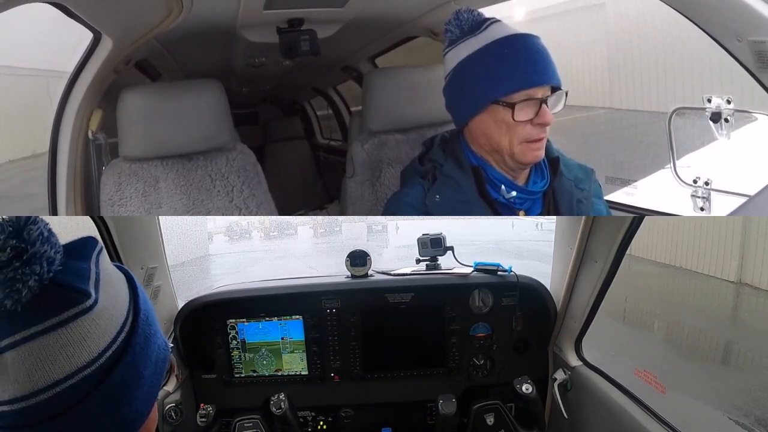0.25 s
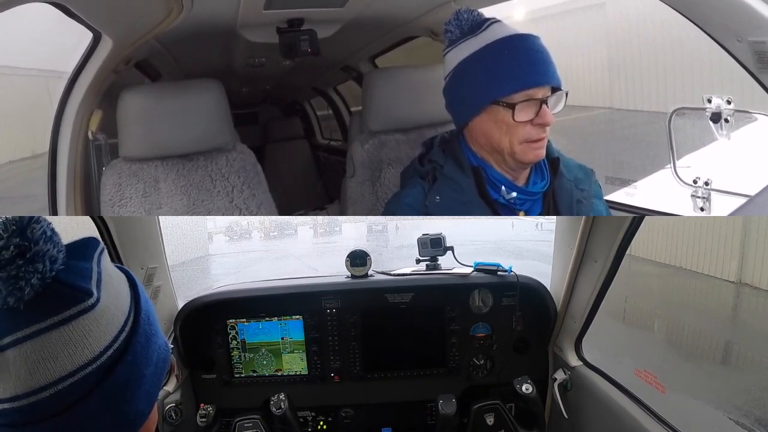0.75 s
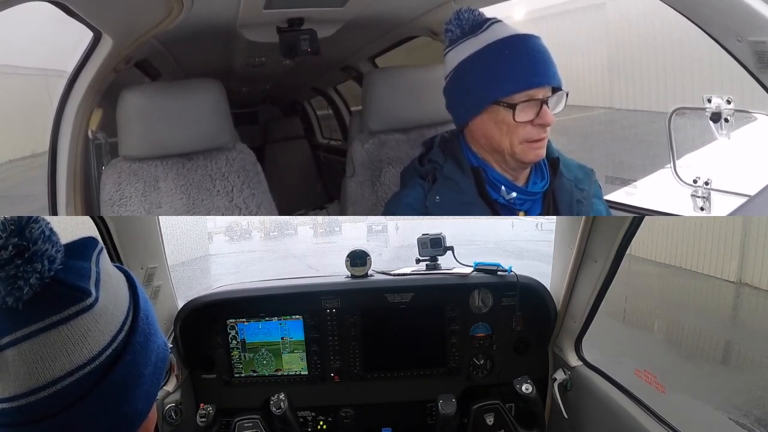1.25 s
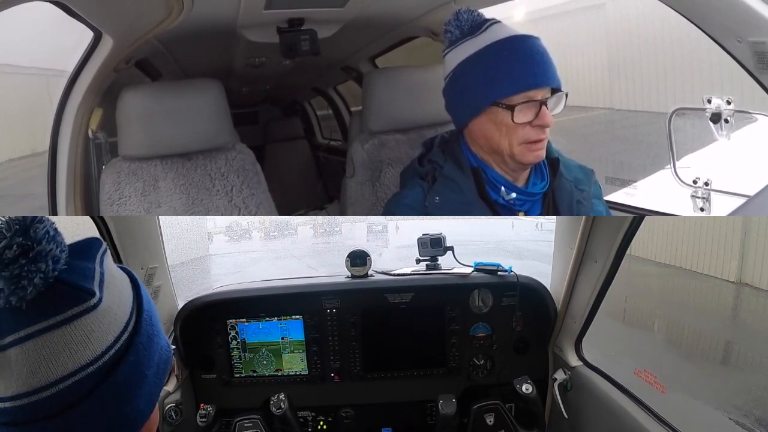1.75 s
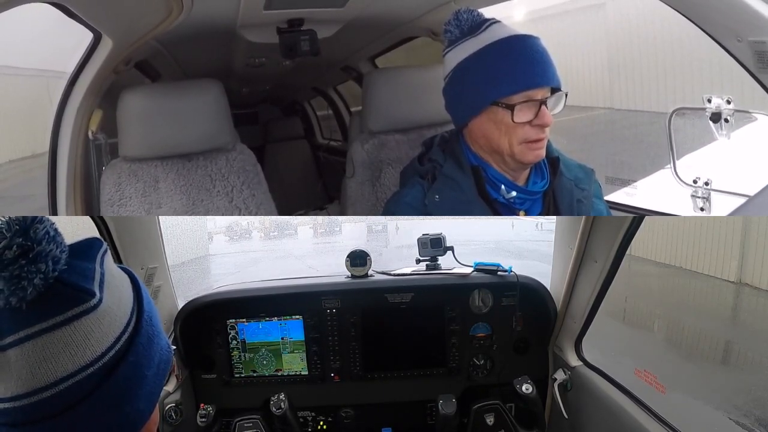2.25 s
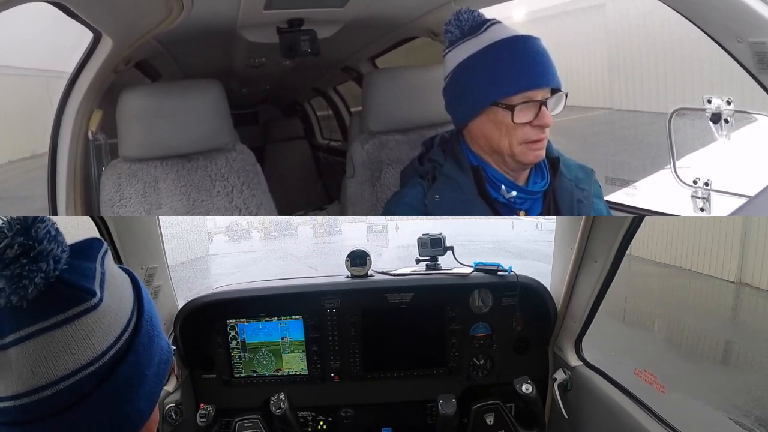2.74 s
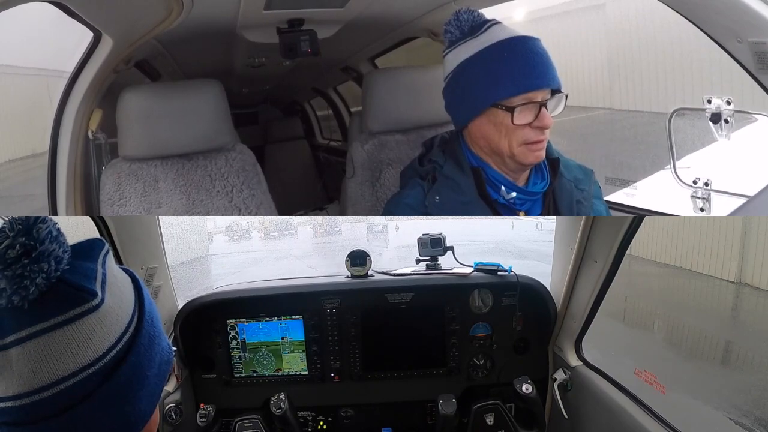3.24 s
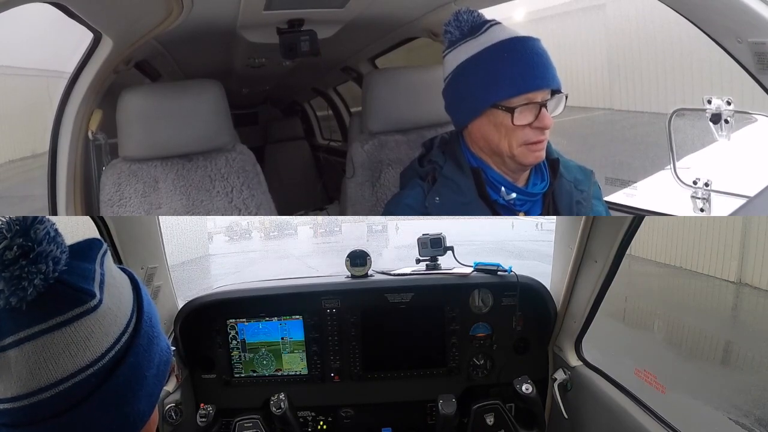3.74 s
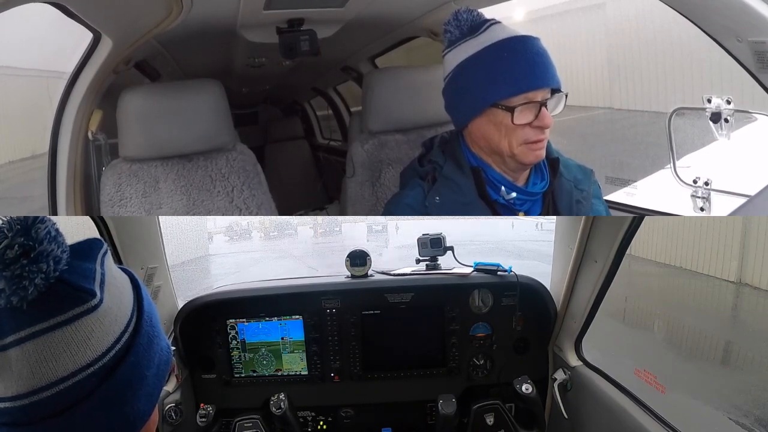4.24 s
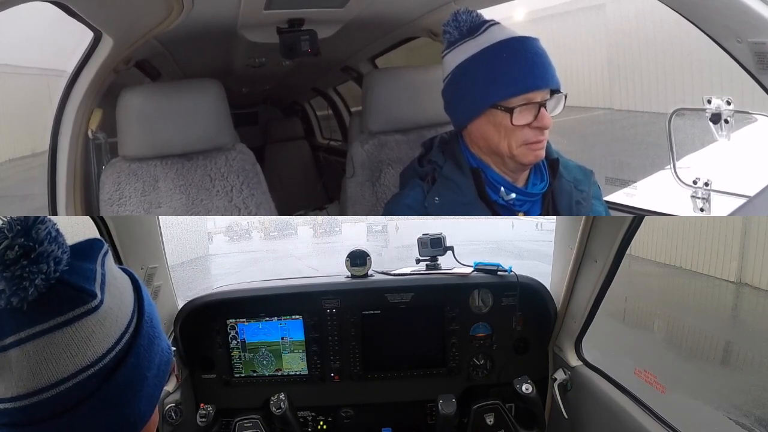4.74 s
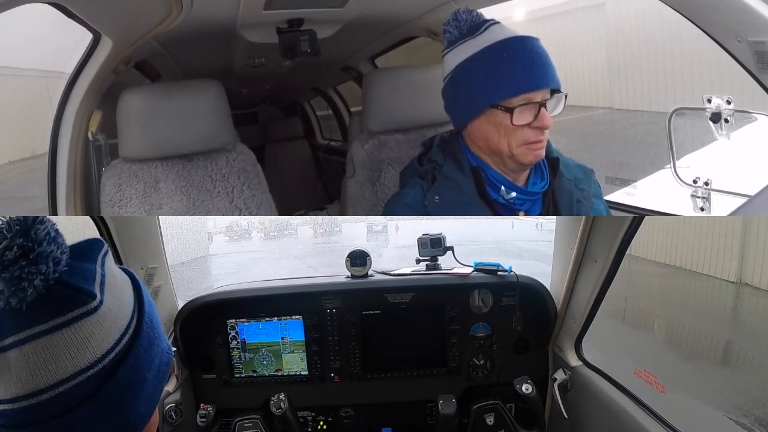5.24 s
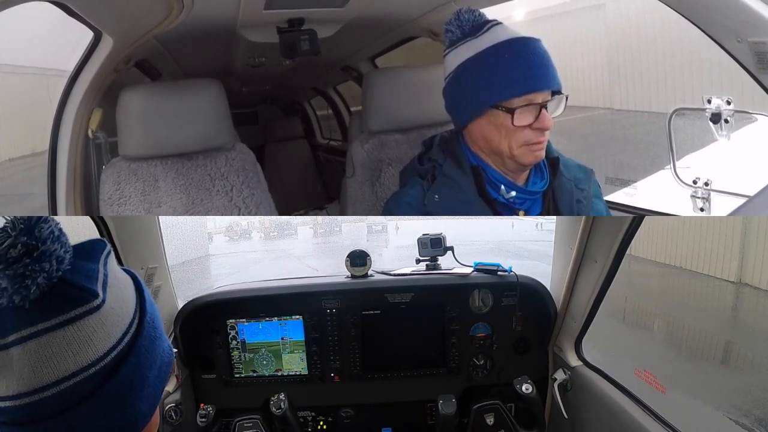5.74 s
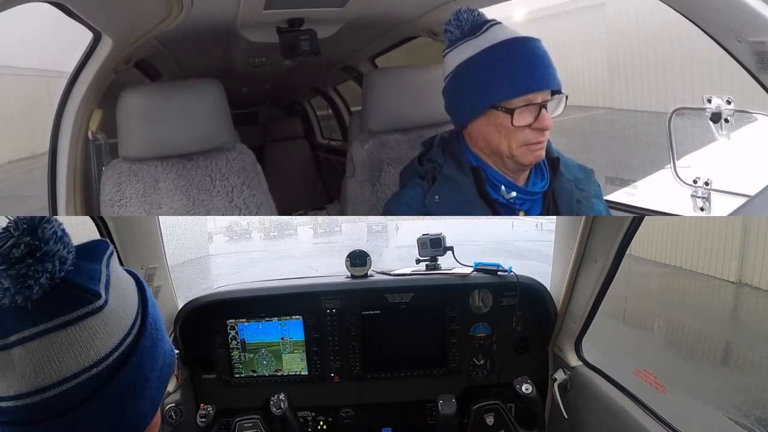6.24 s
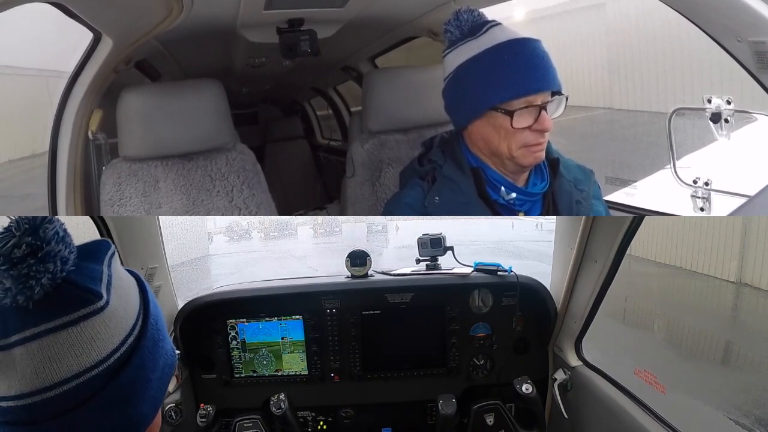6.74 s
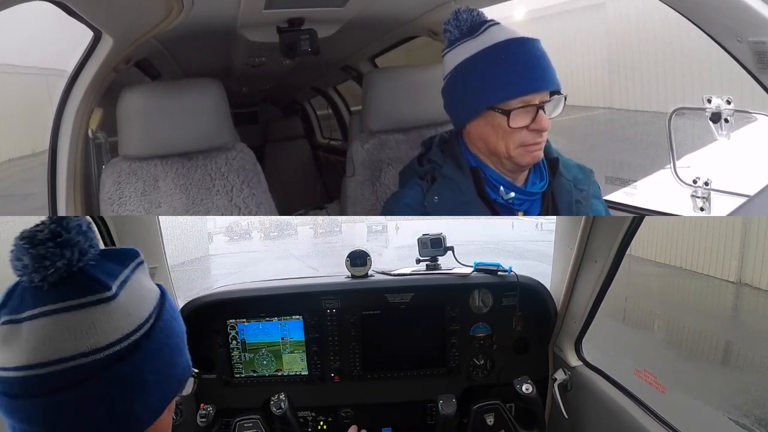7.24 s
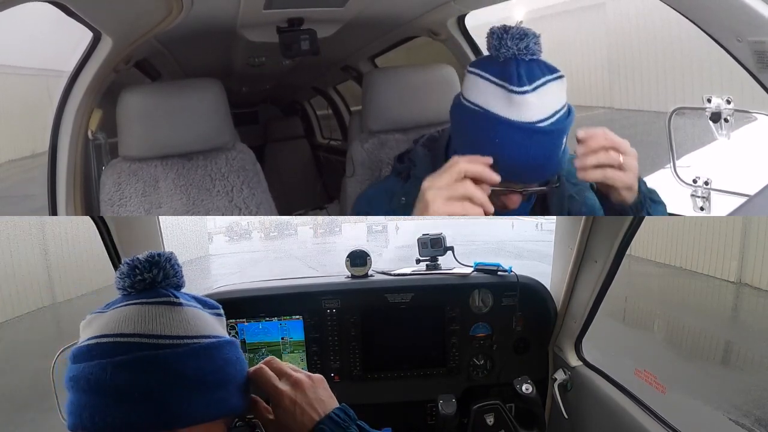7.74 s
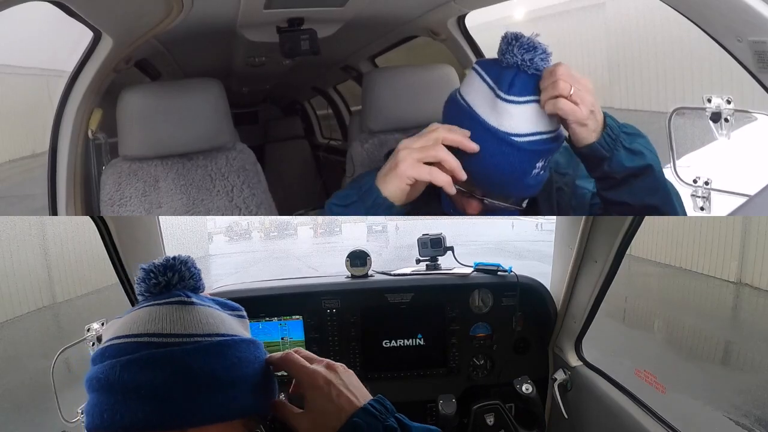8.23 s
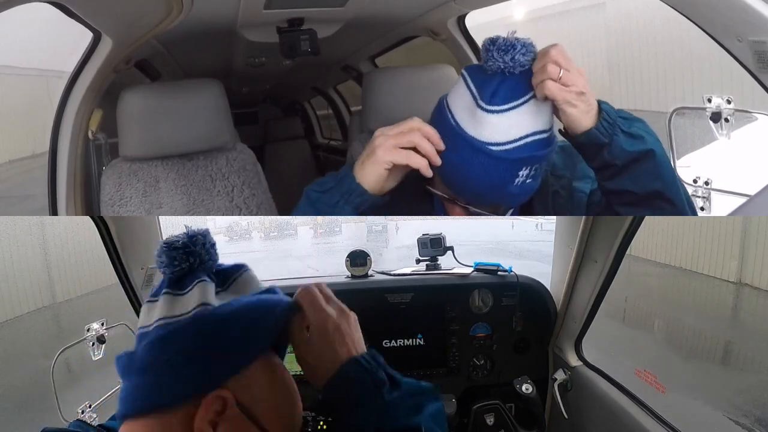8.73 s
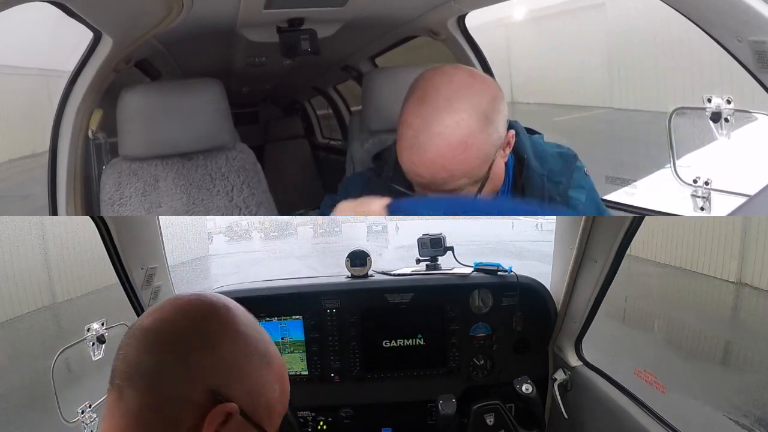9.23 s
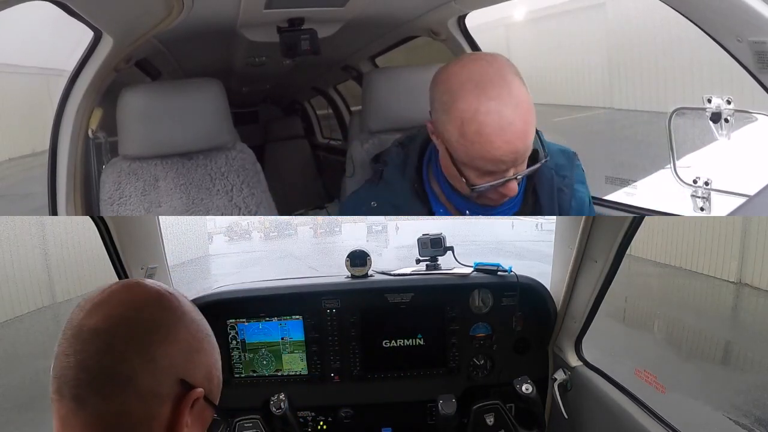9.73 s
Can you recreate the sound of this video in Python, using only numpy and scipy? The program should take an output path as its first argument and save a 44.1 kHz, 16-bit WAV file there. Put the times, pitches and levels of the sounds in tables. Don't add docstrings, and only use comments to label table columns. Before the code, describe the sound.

A continuous lumpy piston engine idle, heard from a cockpit-mounted camera: deep separate thumps, droning propeller hum, muffled body roar and slow air buffeting. Over it lie thin diffuse hiss, valve ticking, small panel rattles and sharp bright trim clicks. Scattered firewall bangs peak between five and six seconds. The idle slows slightly, then faint control knocks and grainy clothing rubs appear near the end.

```python
import sys
import numpy as np
from scipy import signal
from scipy.fft import rfft, irfft, next_fast_len
from scipy.io import wavfile
from scipy.ndimage import map_coordinates

SR = 44100
rng = np.random.default_rng(int(sys.argv[2]) if len(sys.argv) > 2 else 0)


def voltage_ratio(decibels):
    exponent = np.asarray(decibels, float) / 20
    return 10 ** exponent


def master(y):
    cut = np.clip(np.atleast_2d(y).T, -1, 1)
    pcm = np.round(cut * 32767)
    wavfile.write(sys.argv[1], SR, pcm.astype(np.int16))


N = 440118


def unit(x):
    return x / np.sqrt(np.mean(x ** 2) + 1e-20)


def along(points, hz):
    f, v = np.transpose(points)
    return np.interp(np.log(hz + 1), np.log(f + 1), v)


def curves(rows):
    s, *cols = np.transpose(rows)
    return [np.interp(np.arange(N) / SR, s, c) for c in cols]


def wobble(knots_per_s):
    knots = rng.standard_normal(int(N * knots_per_s / SR) + 4)
    return map_coordinates(knots, [np.arange(N) * knots_per_s / SR])


def filtered(x, response):
    m = next_fast_len(N + SR // 2)
    return irfft(rfft(x, m) * response(np.fft.rfftfreq(m, 1 / SR)), m)[..., :N]


def mode(f, hz, width_hz):
    return 1j * f * width_hz / (hz * hz - f * f + 1j * f * width_hz + 1e-9)


def rush(spectrum, alike, lead=0):
    def response(hz):
        turn = np.arccos(np.clip(along(alike, hz), -1, 1)) / 2
        return voltage_ratio(along(spectrum, hz)) * [np.cos(turn), np.sin(turn)]
    mid, side = filtered(rng.standard_normal((2, N)), response)
    return unit(np.array([mid + side, np.roll(mid - side, lead)]))


def burst(hz, width_hz, t60_s, spread):
    t = np.arange(SR // 10) / SR
    noise = rng.standard_normal(len(t)) + spread * rng.standard_normal((2, len(t)))
    ring = irfft(rfft(noise) * mode(np.fft.rfftfreq(len(t), 1 / SR), hz, width_hz) ** 2, len(t))
    ring[1] = np.roll(ring[1], 4)
    decay = voltage_ratio(-60 * t / t60_s) + 0.21 * voltage_ratio(-60 * t / (4 * t60_s))
    return unit(ring) * decay * (1 - np.exp(-t / 0.00079)) ** 2


def click(hz, t60_s):
    t = np.arange(SR // 10) / SR
    ring = np.sin(2 * np.pi * hz * t) * voltage_ratio(-60 * t / t60_s) * (1 - np.exp(-t / 0.00024))
    return np.array([ring, np.roll(ring, 4)])


def silence():
    return np.zeros((2, N + SR))


def add(out, at, sound):
    out[:, at:at + sound.shape[1]] += sound


# (time [s], speed [rpm])
SPEED_RPM = [(0.0, 1048.2), (1.4, 1050.0), (1.99, 1057.1), (3.42, 1045.0), (4.97, 1015.0), (6.54, 998.3),
             (7.33, 989.5), (8.61, 984.5), (9.98, 994.2)]


def crank():
    turned_at_start = -.418
    return turned_at_start + np.cumsum(curves(SPEED_RPM)[0]) / SR / 20


CYLINDER_STRENGTH = [1.0, 0.84, 0.79, 0.97, 0.81, 0.76]
# (time [s], strength of stumble one cycle before [relative])
STEPS = [(.18, 0), (.752, .37), (1.78, .35), (3.033, .97), (3.147, .48), (3.492, 0), (3.838, .77),
         (4.654, .42), (5.008, .67), (5.84, 0), (6.198, 0), (6.558, 0), (6.919, 0), (7.525, 0),
         (7.889, .69), (8.985, 0)]


def firings(turned):
    catch, catch_fade_per_s, saved_charge = 1.15, 0.023, 0.064
    slot = np.arange(int(turned[-1]) + 2)
    at = np.searchsorted(turned, slot)
    at[-1] = 2 * at[-2] - at[-3]
    size = np.ones(len(slot))
    size[slot % 12 == 0] = 0
    size[slot % 6 == 3] = 0
    for s, stumble in STEPS:
        first = np.argmin(abs(at - s * SR))
        size[first::6] = 0
        size[first::12] = catch - catch_fade_per_s * at[first::12] / SR
        size[first] += saved_charge * (stumble == 0)
        size[first - 6] = stumble
    scatter = voltage_ratio(rng.normal(0, 1.0, len(slot)))
    pulses = np.zeros(N + SR // 10)
    pulses[at] = size * np.array(CYLINDER_STRENGTH)[slot % 6] * scatter
    return pulses


# (centre [Hz], width [Hz], signed strength [relative])
CABIN_MODES = [(33.4, 16.3, -0.209), (57.7, 13.2, -0.536), (58.6, 15.6, 0.7), (96.5, 7.4, -0.073),
               (147.7, 14.7, -0.018)]


def exhaust(pulses):
    def response(f):
        puff = 1000 * np.exp(2j * np.pi * f * .016) / (1 + 1j * f / 153.6) ** 2
        return puff * sum(g * mode(f, hz, width_hz) for hz, width_hz, g in CABIN_MODES)
    return filtered(pulses, response)


# (shaft order, start level [dB], end level [dB], start lag [deg], end lag [deg])
SHAFT_ORDERS = [(.5, -36, -25, 320, 270), (1, -25.5, -31.8, 248, 240), (2, -29.6, -34, 151, 151),
                (3, -23.5, -22.2, 253, 253), (4.5, -32.8, -28.5, 17, 17), (6, -36.8, -30.3, 0, -2),
                (7.5, -42.5, -45, 310, 170), (9, -41, -52, 35, 70)]


def shaft(turned):
    share, out = np.arange(N) / N, 0
    for order, first_db, last_db, first_deg, last_deg in SHAFT_ORDERS:
        level = voltage_ratio(first_db) * (1 - share) + voltage_ratio(last_db) * share
        lag = np.radians(first_deg + (last_deg - first_deg) * share)
        out = out + 2 ** .5 * level * voltage_ratio(1.1 * wobble(4)) * np.cos(2 * np.pi * order * turned / 3 - lag)
    return out


# (shaft order, start level [dB], end level [dB])
BUZZ_ORDERS = [(12, -46, -46), (11.5, -51, -62), (13, -64, -54), (15, -60, -55), (13.5, -54, -62),
               (16.75, -53, -64), (18, -58, -54), (21, -53, -61), (24, -55, -55), (27, -58, -59),
               (29, -70, -57), (30, -66, -57), (36, -63, -59), (39, -70, -63), (42, -61, -70),
               (45, -54, -58), (48, -68, -63)]


def buzz(turned):
    share, out = np.arange(N) / N, 0
    for order, first_db, last_db in BUZZ_ORDERS:
        level_db = first_db + (last_db - first_db) * share + 3.2 * wobble(3)
        drift = (.8 + .012 * order) * wobble(2.5)
        out = out + 2 ** .5 * voltage_ratio(level_db) * np.cos(2 * np.pi * order * turned / 3 + drift)
    return out


# (frequency [Hz], density [dB])
RUMBLE_COLOUR = [(8, -43), (16, -2), (30, -14), (60, 9.5), (100, 15), (120, -18), (200, -48), (400, -120)]


def wash():
    share = np.arange(N) / N
    lull = np.minimum(np.minimum(np.arange(N), N - np.arange(N)) / SR / .1, 1)
    gust_db = -21 + 2 * share + 1.5 * wobble(7.5)
    gust_colour = [(1, -27), (3, 3), (6, 0.5), (10, -2), (15, -8.5), (22, -36), (40, -120)]
    gusts = voltage_ratio(gust_db) * rush(gust_colour, [(30, 1.0)])
    rumble = voltage_ratio(-36.5 + 5 * share) * rush(RUMBLE_COLOUR, [(30, 0.58)])
    return lull * (gusts + rumble)


def frame(turned, pulses):
    t60_s, lead_s, drift_rad, alternate = .26, .006, .8, .6
    t = np.arange(SR // 3) / SR
    every_cycle = np.tile(rng.standard_normal((2, 6, len(t))), (1, 2, 1))
    paths = every_cycle + alternate * rng.standard_normal((2, 12, len(t)))
    paths = paths * voltage_ratio(-60 * t / t60_s) * (1 - np.exp(-t / 0.0016))
    paths = paths - paths.mean(1, keepdims=True)
    angle = drift_rad * (wobble(0.95) + np.arange(N) / SR / 2)
    out = np.zeros((1, N + SR))
    for i in np.flatnonzero(pulses[:N]):
        first, second = paths[:, round(turned[i]) % 12]
        ring = np.cos(angle[i]) * first + np.sin(angle[i]) * second
        add(out, max(i - round(lead_s * SR), 0), pulses[i] * ring[None])
    return unit(out[0, :N])


# (time [s], roar level [dB])
ROAR_DB = [(0, -37.5), (3.2, -36.5), (4.1, -40), (5.2, -39), (6.1, -37), (6.8, -38.5), (9.98, -39)]
# (frequency [Hz], density [dB])
ROAR_COLOUR = [(70, -33.5), (120, -8.5), (150, -5.5), (172, -10), (208, -5), (230, -8.5), (380, -9.5),
               (500, -14.5), (800, -22), (1100, -27), (1250, -29.5), (2000, -35), (3600, -42), (5000, -65),
               (9000, -120)]
# (frequency [Hz], likeness [0-1])
ROAR_ALIKE = [(60, 0.95), (130, 0.85), (200, 0.98), (300, 1), (640, 0.96), (1400, 0.9), (3000, 0)]
# (frequency [Hz], share [0-1])
LOCKED_SHARE = [(100, .6), (170, .6), (250, .7), (450, .5), (800, .3), (1300, .1), (2000, 0)]


def roar(turned, pulses):
    roar_db, = curves(ROAR_DB)
    beat = unit(filtered(pulses, lambda f: np.exp(2j * np.pi * f * 0.0041) / (1 + 1j * f / 40) ** 2))
    left, right = rush(ROAR_COLOUR, ROAR_ALIKE)
    mid, side = (left + right) / 2, (left - right) / 2
    shaken = unit(filtered(frame(turned, pulses), lambda f: voltage_ratio(along(ROAR_COLOUR, f))))
    loose = filtered(mid, lambda f: (1 - along(LOCKED_SHARE, f)) ** .5) * (1 + 0.15 * beat)
    mid = loose + filtered(shaken, lambda f: along(LOCKED_SHARE, f) ** .5)
    return voltage_ratio(roar_db + 1.5 + 0.75 * wobble(9)) * np.array([mid + side, mid - side])


# (frequency [Hz], density [dB])
HISS_COLOUR = [(1180, -27), (2000, -18), (2880, -1), (3190, -3), (5090, 1), (6830, -1), (8260, -3),
               (9900, -6.5), (12000, -12.5), (14000, -14.5), (15300, -18), (15800, -27)]


def hiss():
    roar_db, = curves(ROAR_DB)
    hiss_db = -59 + 0.71 * (roar_db - roar_db.mean())
    flutter_db = .6 * wobble(9) + 1.1 * wobble(30)
    return voltage_ratio(hiss_db + 2 + flutter_db) * rush(HISS_COLOUR, [(3000, .3), (9000, .36)], lead=4)


# (centre [Hz], width [Hz], level [dB rms])
WHINE_BANDS = [(948, 5.7, -59.5), (1067, 49, -56), (1478, 30, -65.5), (2530, 47, -78.5), (4820, 2.2, -83)]


def whines():
    out = 0
    for hz, width_hz, db in WHINE_BANDS:
        band = filtered(rng.standard_normal(N), lambda f: mode(f, hz, width_hz) ** 2)
        out = out + voltage_ratio(db) * unit(band)
    return out


# (interval [firings], offset [firings], centre [Hz], width [Hz], t60 [s],
# start level [dB], end level [dB], scatter [dB])
TAPPET_PARTS = [(6, .45, 1040, 530, 0.12, -52, -48, 3), (3, .4, 826, 380, 0.067, -47, -48.5, 5),
                (3, 2.5, 8420, 1000, 0.037, -56.5, -59, 1), (6, 4.7, 7100, 4100, 0.042, -53.5, -54.5, 2.5),
                (6, 4.3, 8700, 4100, 0.032, -57, -65, 1)]


def tappets(turned):
    out = silence()
    for every, offset, hz, width_hz, t60_s, first_db, last_db, scatter_db in TAPPET_PARTS:
        for i in np.searchsorted(turned, np.arange(offset, turned[-1], round(every))):
            level_db = first_db + (last_db - first_db) * i / N + rng.normal(0, scatter_db)
            add(out, i, voltage_ratio(level_db) * burst(hz, width_hz, t60_s, spread=1.1 * hz / 6000))
    return out[:, :N]


# (rate [1/s], centre [Hz], width [Hz], t60 [s], level [dB])
RATTLE_PANELS = [(8, 2600, 240, 0.16, -61), (10, 3530, 980, 0.077, -57.5), (8, 1800, 140, 0.12, -62),
                 (6, 1454, 200, 0.14, -56.5)]


def rattles():
    out = silence()
    for rate, hz, width_hz, t60_s, db in RATTLE_PANELS:
        for where, size in rng.random((10 * round(rate), 2)):
            hit_db = db - 7 * np.log10(size + 0.2)
            add(out, int(where * N), voltage_ratio(hit_db) * burst(hz, width_hz, t60_s, spread=0.77))
    return out[:, :N]


# (time [s], peak level [dB], centre [Hz], left-right [dB])
TRIM_SNAPS = [(0.0433, -46.5, 8660, 0.5), (0.2706, -40.5, 8100, 0), (0.3975, -48, 6770, -1.0),
              (0.5018, -42.5, 7800, 1.0), (1.5873, -40.5, 8300, 4), (1.8701, -47, 8770, 3),
              (2.1011, -43.5, 8500, 0.5), (2.4503, -44, 6560, 1), (2.5541, -39, 7700, 0.5),
              (2.7816, -43, 8300, 3), (3.267, -34, 7750, 1.5), (3.6686, -42, 6860, -1),
              (4.1654, -45, 7820, 2), (5.128, -39, 8700, 3), (5.3366, -39, 7800, 2.0),
              (5.619, -40.5, 6590, -1), (6.0194, -39, 7800, 1.0), (6.2936, -44, 8600, 1),
              (7.0414, -32, 7640, 0), (7.257, -42.5, 7010, 4), (7.7089, -41, 7100, 0.5),
              (8.227, -42.5, 6940, 0.0), (8.4696, -46, 7020, 1.5), (8.7126, -41, 6510, 1.5),
              (9.4564, -43, 8650, 3), (9.6535, -38, 8370, 3), (9.7592, -36, 7040, 1.5)]
# (time [s], peak level [dB], centre [Hz], left-right [dB])
TRIM_CLUSTER = [
    (4.5929, -40, 8200, 3),
    (4.5951, -30, 6700, 3),
    (4.5971, -32.5, 7000, 2),
]


def trim():
    out = silence()
    for s, db, hz, pan_db in [*TRIM_SNAPS, *TRIM_CLUSTER]:
        snap = .5 * burst(hz, 2600, 0.057, spread=1.0) + 0.22 * burst(1.2 * hz, 4500, 0.013, spread=0.9)
        snap = snap + 3.4 * click(1.07 * hz, .005) + 2.8 * click(1.5 * hz, .004)
        add(out, round(s * SR), voltage_ratio(db - 6.0 + np.array([[.5], [-.5]]) * pan_db) * snap)
    return out[:, :N]


# (time [s], peak level [dB], centre [Hz])
FIREWALL_BANGS = [
    (1.391, -34, 657),
    (2.306, -31, 624),
    (3.751, -36, 506),
    (3.799, -31, 783),
    (4.024, -34, 519),
    (4.537, -33, 568),
    (5.604, -24, 501),
    (6.813, -35, 579),
]


def bangs():
    out = silence()
    for s, db, hz in FIREWALL_BANGS:
        add(out, round(s * SR), voltage_ratio(db - 8) * burst(hz, 700, .04, spread=.12))
    return out[:, :N]


# (time [s], peak level [dB])
CONTROL_KNOCKS = [
    (1.7962, -39),
    (7.4573, -43),
    (7.478, -36),
    (8.084, -42),
    (9.181, -47),
    (9.3013, -52),
    (9.3591, -46),
]


def knocks():
    out = silence()
    for s, db in CONTROL_KNOCKS:
        add(out, round(s * SR), voltage_ratio(db + 5.0) * burst(1500, 3500, 0.01, spread=0.36))
    return out[:, :N]


# (frequency [Hz], density [dB])
CLOTH_COLOUR = [(880, -27), (1500, -1), (2160, -11), (2410, -11.5), (2850, -4.5), (3170, -8.5), (3860, -10),
                (8490, -6.5), (15800, -18)]
# (start [s], length [s], end level [dB])
CLOTH_STROKES = [
    (7.29, .31, -52.5),
    (8.55, .08, -58.5),
    (8.71, 0.011, -56.5),
    (8.783, 0.027, -54),
    (8.896, 0.19, -66),
    (9.12, 0.14, -65),
    (9.378, .11, -54.5),
    (9.497, 0.06, -63),
    (9.614, .15, -47.5),
    (9.754, 0.013, -45),
]


def jacket():
    swell_db_per_s, edge_db = 16, 14
    attack_s, attack_per_length, release_s = .03, .3, .05
    time, stroke = np.arange(N) / SR, 0
    for s, length, db in CLOTH_STROKES:
        before = np.maximum((s - time) / (attack_s + attack_per_length * length), 0)
        after = np.maximum((time - s - length) / release_s, 0)
        swell_db = swell_db_per_s * np.minimum(time - s - length, 0)
        stroke = np.maximum(stroke, voltage_ratio(db + swell_db - edge_db * (before + after)))
    grain = voltage_ratio(1.8 * wobble(150) + .8 * wobble(30))
    return stroke * unit(grain * rush(CLOTH_COLOUR, [(3000, 0.35)], lead=4))


# (frequency [Hz], left-right [dB])
TREBLE_LEAN = [(1500, 1), (3000, -1.5), (6000, -.5), (10000, .5), (14000, 1)]


def scene():
    turned = crank()
    pulses = firings(turned)
    low = exhaust(pulses) + shaft(turned) + buzz(turned) + wash() + roar(turned, pulses) + whines()
    treble = hiss() + tappets(turned) + rattles() + trim() + bangs() + knocks() + jacket()
    treble = filtered(treble, lambda f: voltage_ratio(along(TREBLE_LEAN, f) * np.array([[.5], [-.5]])))
    return low * voltage_ratio([[-.9], [.8]]) + treble


def low_pass(x):
    return signal.sosfilt(signal.butter(12, 15780, fs=SR, output="sos"), x)


def record(dry):
    ceiling, hardness = 0.66, 18
    rounded = dry / (1 + abs(dry / ceiling) ** hardness) ** (1 / hardness)
    return low_pass(rounded)


dry = scene()
out = record(dry)
master(out)
```